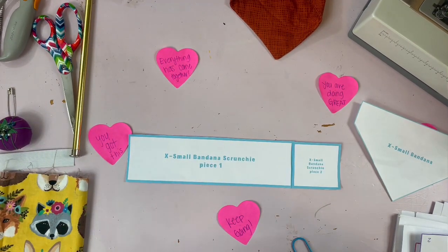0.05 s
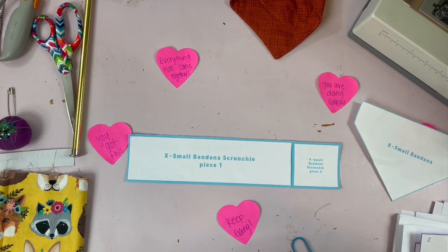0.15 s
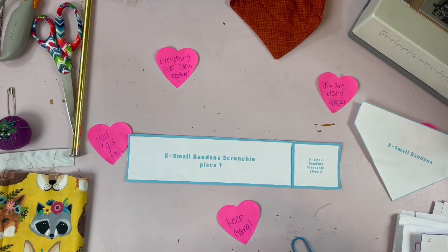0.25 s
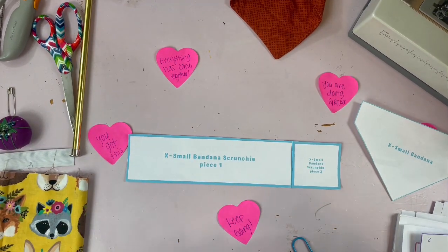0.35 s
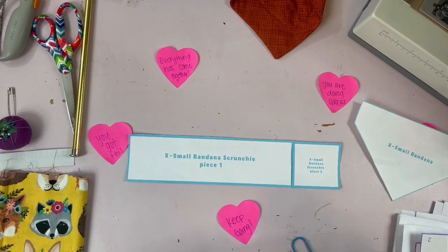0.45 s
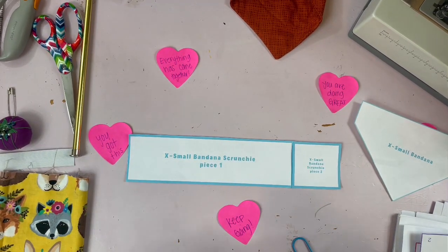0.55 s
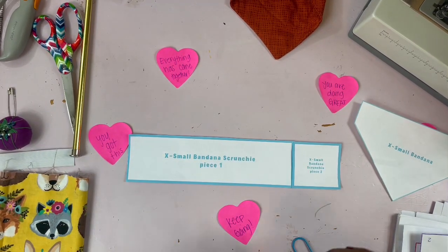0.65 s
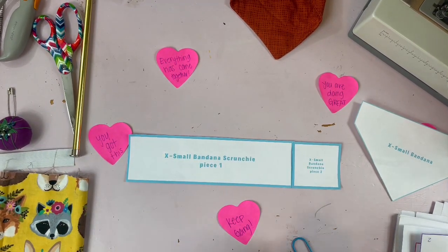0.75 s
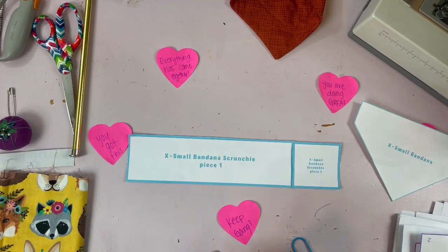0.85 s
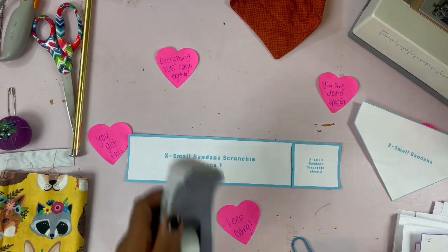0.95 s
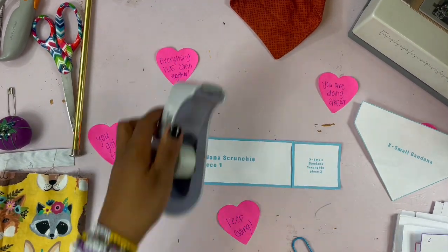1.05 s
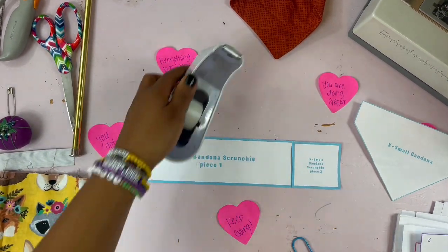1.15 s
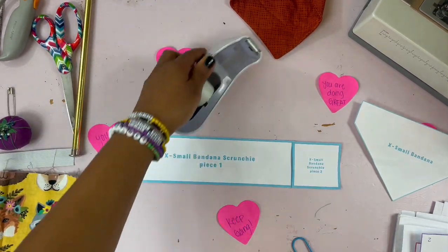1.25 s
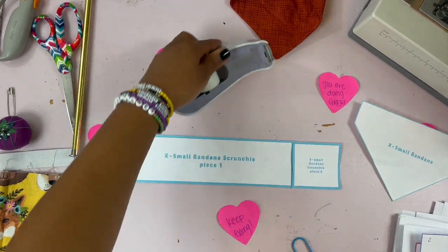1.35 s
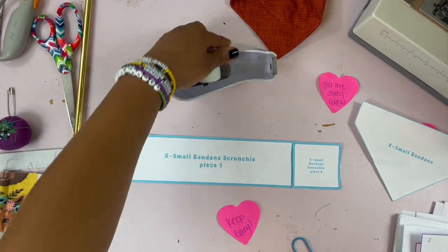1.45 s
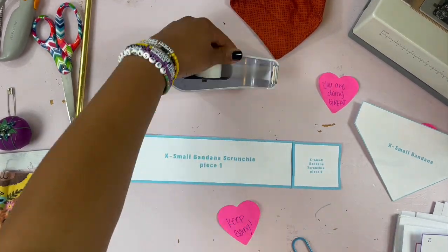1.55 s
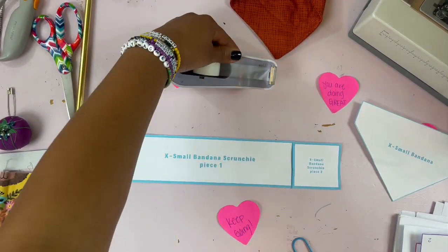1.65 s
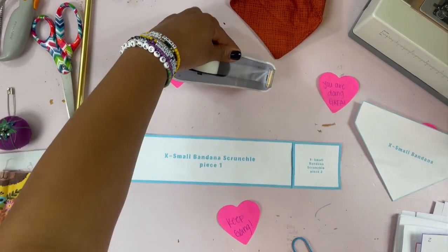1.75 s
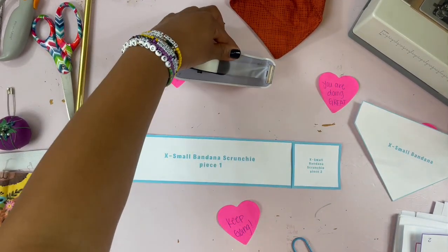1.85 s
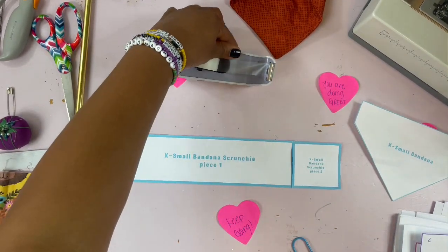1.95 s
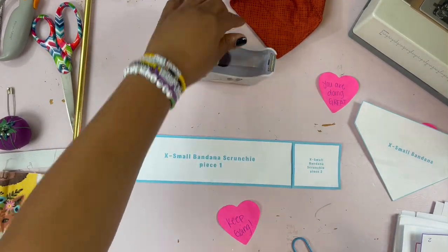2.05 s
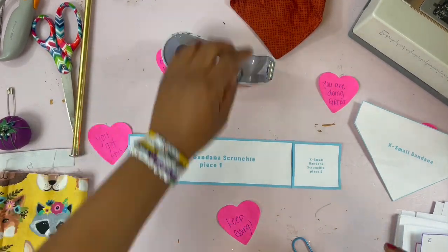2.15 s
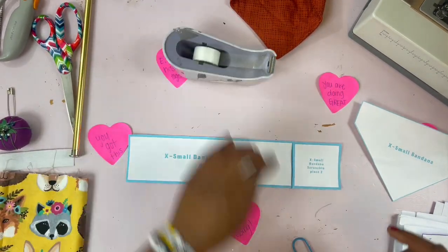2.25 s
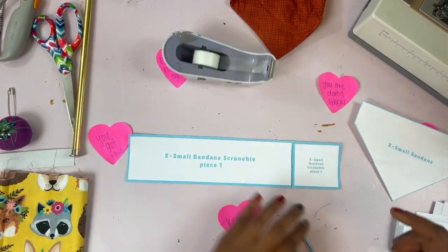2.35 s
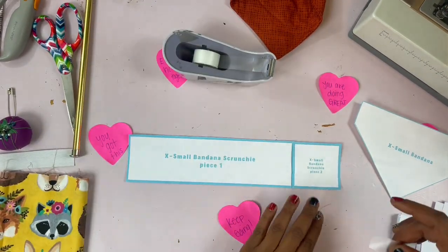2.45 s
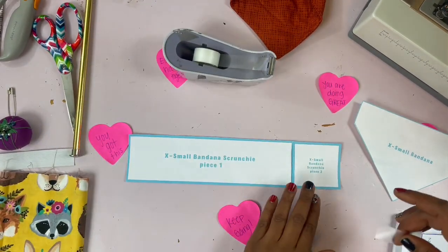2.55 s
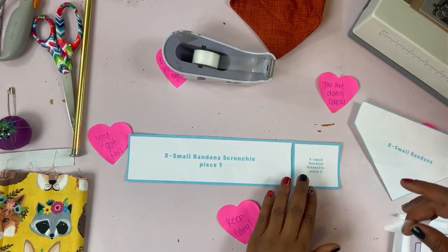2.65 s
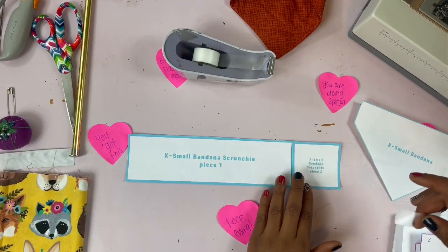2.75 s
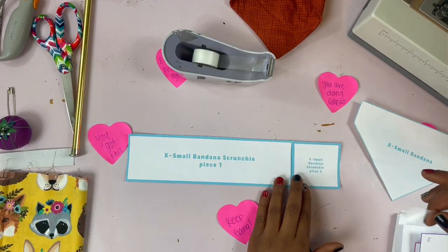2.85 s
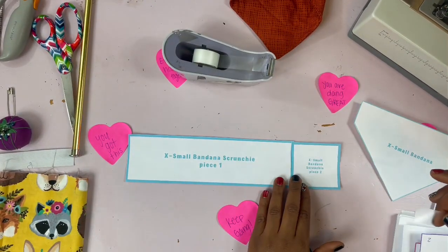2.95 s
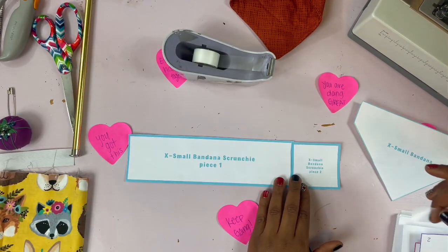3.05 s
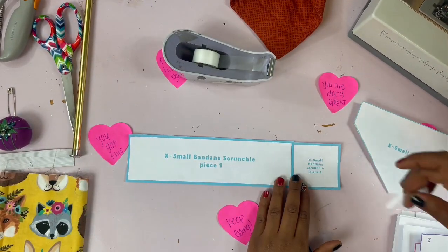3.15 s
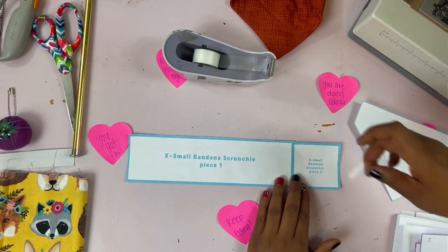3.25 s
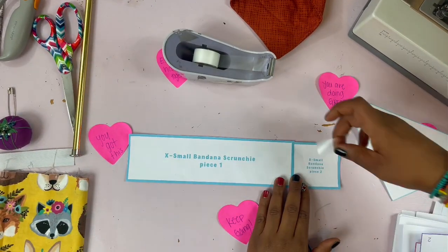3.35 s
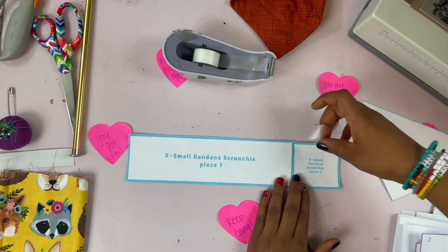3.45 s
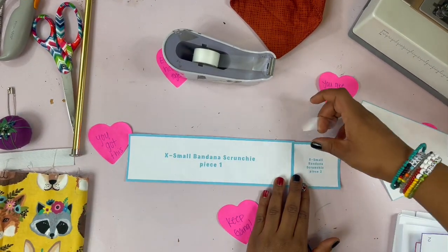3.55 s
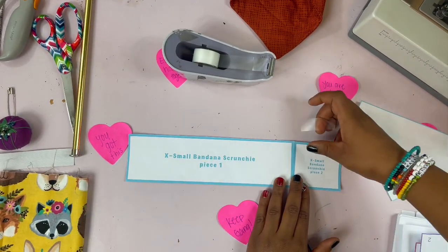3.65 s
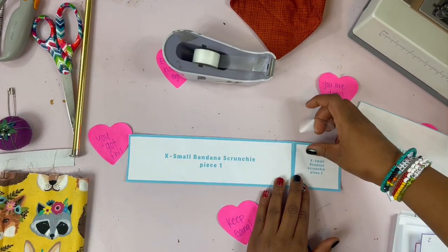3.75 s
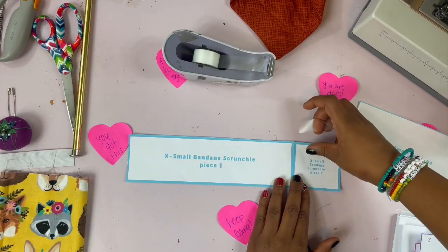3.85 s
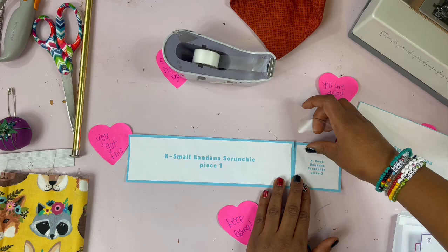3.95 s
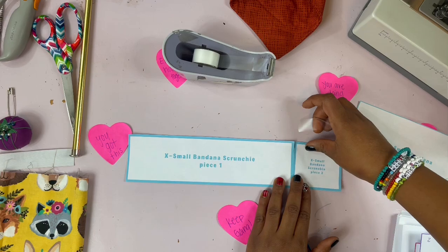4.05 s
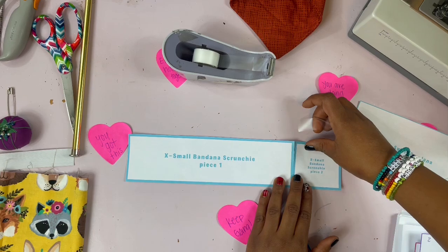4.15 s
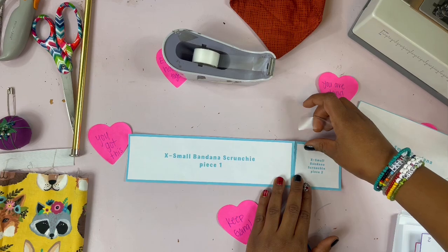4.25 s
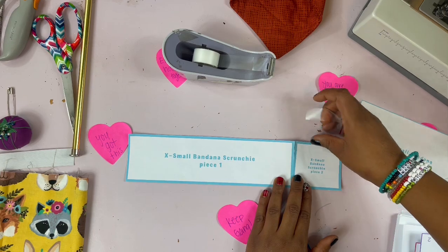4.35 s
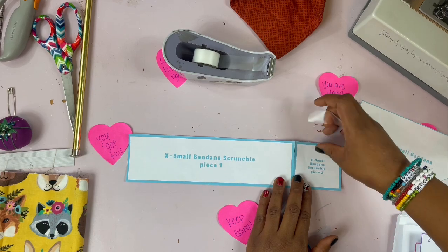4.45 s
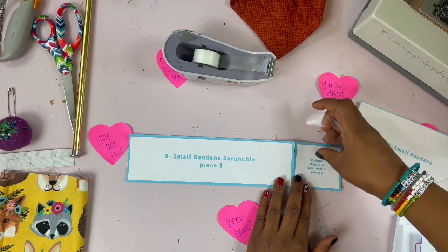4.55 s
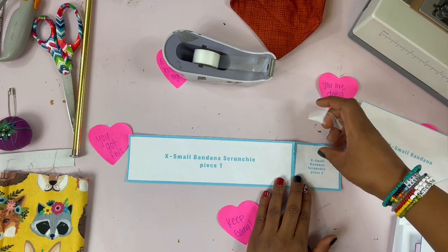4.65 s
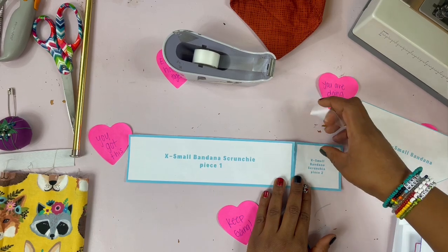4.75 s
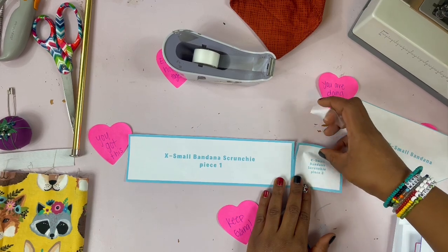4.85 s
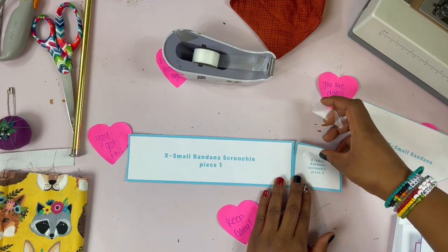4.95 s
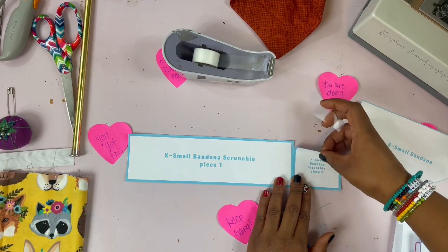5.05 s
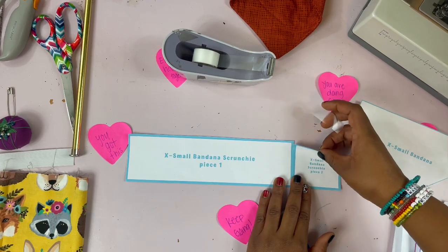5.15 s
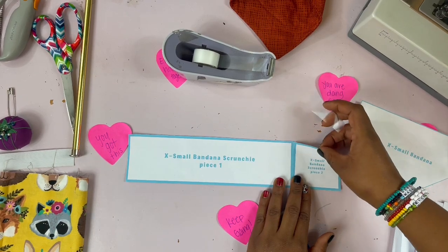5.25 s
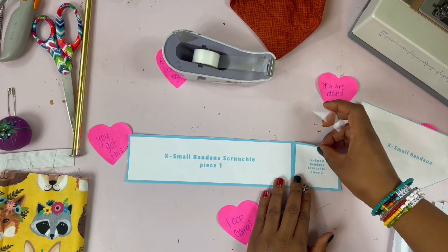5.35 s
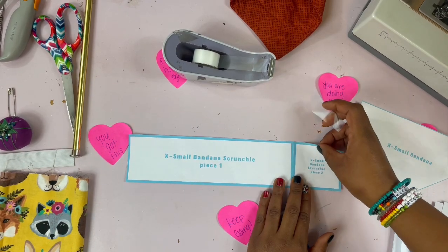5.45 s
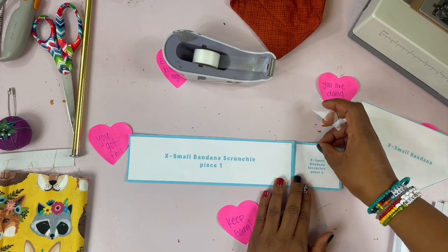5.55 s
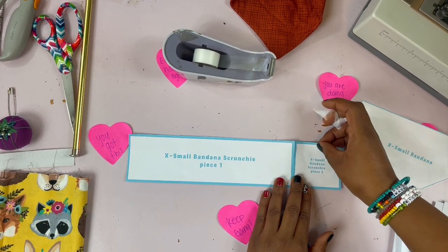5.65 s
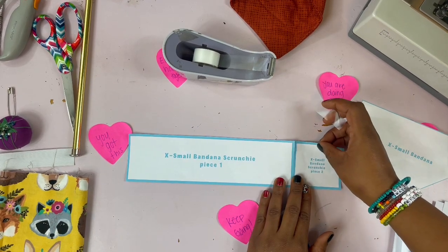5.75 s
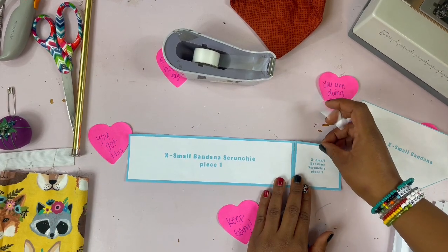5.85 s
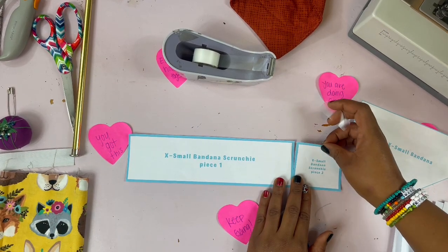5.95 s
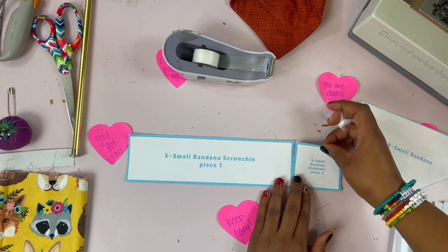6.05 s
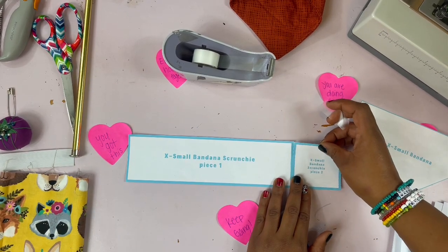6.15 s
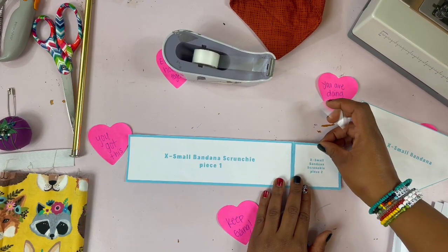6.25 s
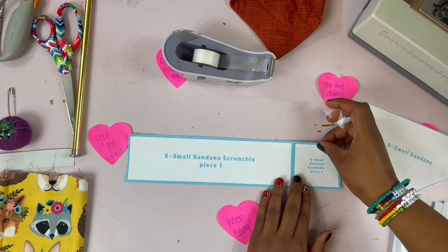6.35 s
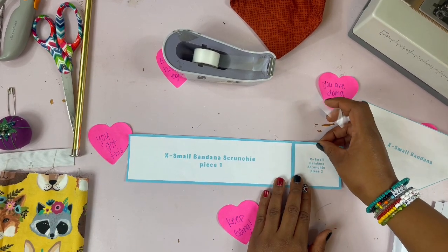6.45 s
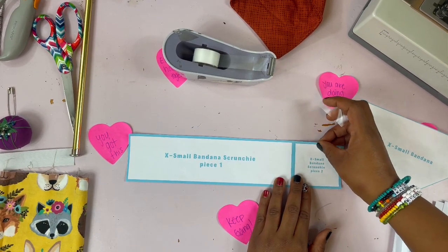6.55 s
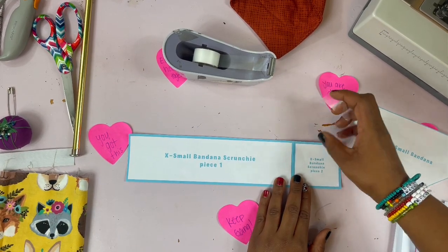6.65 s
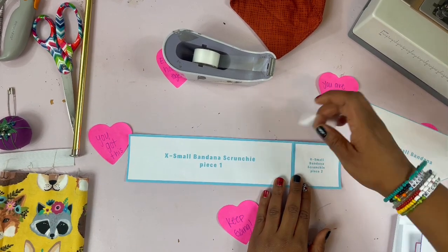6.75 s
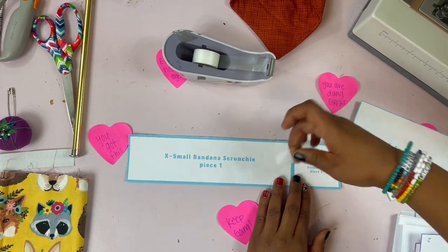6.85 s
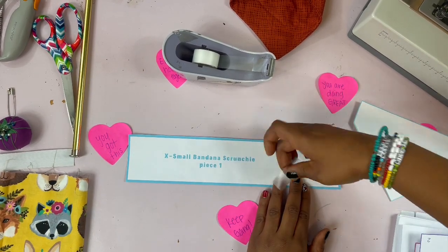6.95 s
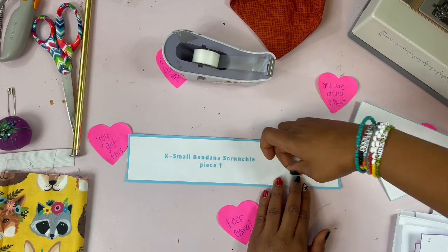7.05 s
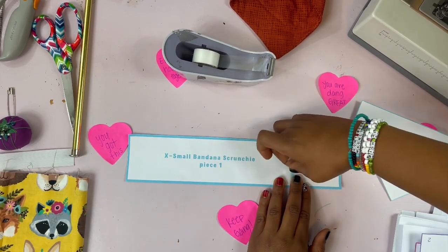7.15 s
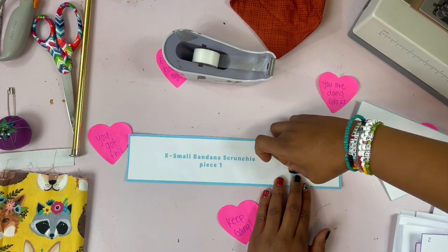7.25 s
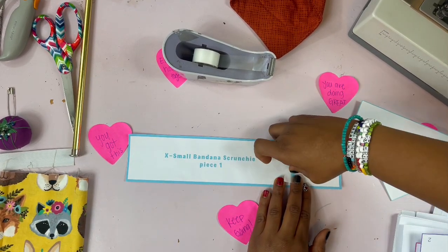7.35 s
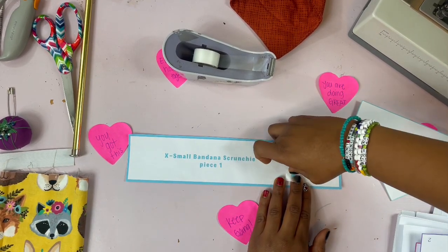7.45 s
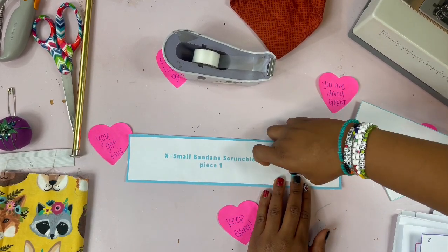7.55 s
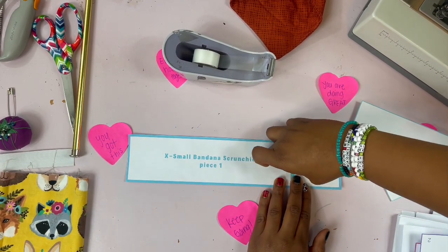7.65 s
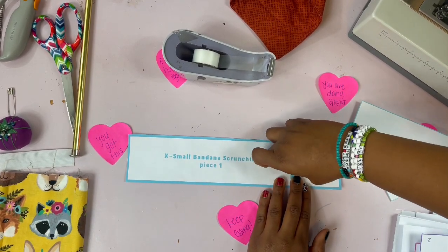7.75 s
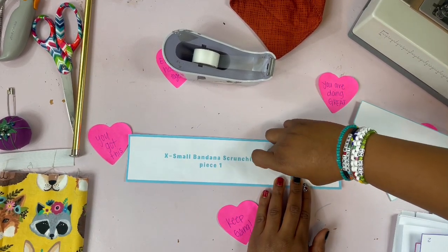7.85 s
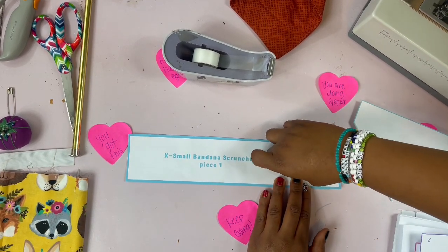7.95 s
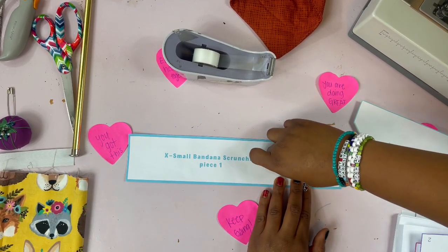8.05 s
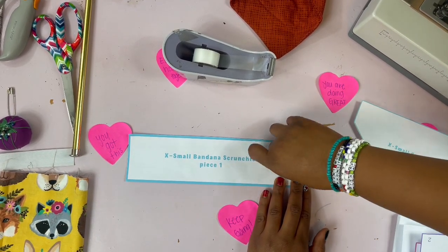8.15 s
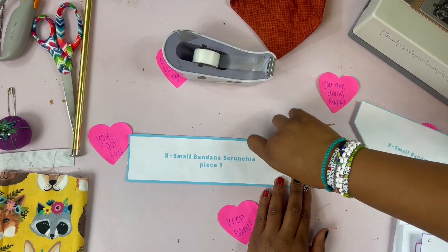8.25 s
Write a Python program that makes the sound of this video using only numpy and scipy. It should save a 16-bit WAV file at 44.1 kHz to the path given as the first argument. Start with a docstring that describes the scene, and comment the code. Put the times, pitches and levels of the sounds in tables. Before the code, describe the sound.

Tape squeals off its roll and snaps, a heavy dispenser knocks down on a table, then faint hand rustles and taps in a small quiet room.

```python
"""Tape hisses and squeals faintly off its roll, close to a two-port microphone in a small, quiet room.
Filtered noise peels and rubs, and a plunging rough tone snaps the tape; short noise bursts click as beads,
plastic and nails. The weighted dispenser is set down in two knocks that ring the table's damped modes.
Later hands slide over paper, a fingertip judders in stick-slip, a strip of tape ticks and nails tap.
Ventilation rumbles low throughout, and the table and hand sounds bring up the room's echoes."""
import sys
import numpy as np
from scipy import signal
from scipy.fft import rfft, irfft, next_fast_len
from scipy.io import wavfile

SR = 44100
rng = np.random.default_rng(int(sys.argv[2]) if len(sys.argv) > 2 else 0)


def wav_record(signal):
    """Record a signal, one row per channel, as 16-bit PCM in the file named by sys.argv[1]."""
    frames = np.transpose(np.atleast_2d(signal))
    bounded = np.clip(frames, -1, 1)
    # unit amplitude maps onto the largest positive 16-bit level
    quanta = np.round(bounded * 32767).astype(np.int16)
    wavfile.write(sys.argv[1], SR, quanta)


N = 366510
T = np.arange(N) / SR

# blows on the table: t/s, peak level/dB, f/Hz above which the soft contact dulls the blow,
# share of the table's free ring time
KNOCKS = [(.532, -36, 234, 0.46), (1.512, -4, 725, 1), (1.7337, -10.5, 378, 0.99), (2.036, -34, 94.4, 1),
          (2.14, -47, 90, 0.61), (2.241, -41.5, 90, 1), (4.504, -40, 700, 0.87), (4.622, -47.5, 322, 0.47),
          (5.183, -38, 350, 0.25), (7.162, -45, 900, 1), (7.888, -34, 910, 0.77), (8.246, -36.5, 580, 0.65)]
# clearest clicks of plastic, beads, tape and nails: t/s, crisp level/dB, hollow level/dB
CLICKS = [(.147, -34, -47), (.153, -37.5, -44), (.165, -38, -38.5), (.169, -35, -40), (0.531, -99, -46.5),
          (0.56, -61.5, -69), (0.637, -18, -37), (0.6863, -50, -45), (1.461, -55, -74.5),
          (1.492, -41.5, -56.5), (1.5109, -39.5, -33.5), (1.52, -37.5, -73), (1.672, -71, -63.5),
          (1.692, -62.5, -70.5), (1.7414, -44, -61), (1.772, -47, -53), (1.842, -56.5, -70),
          (1.852, -59, -70), (1.939, -56.5, -49), (2.032, -40, -45.5), (2.303, -61, -67.5),
          (3.4033, -64.5, -88), (3.432, -62, -80.5), (3.446, -65, -73), (3.6292, -62.5, -80.5),
          (4.631, -56, -72.5), (4.66, -60, -74), (4.722, -64, -77), (4.8204, -57.5, -86),
          (4.852, -43.5, -65), (5.011, -43.5, -61.5), (5.057, -61.5, -59.5), (5.6162, -55.5, -70),
          (6.3325, -74, -58), (6.5881, -42, -60.5), (7.3459, -47.5, -70.5), (7.8865, -38.5, -48),
          (8.191, -55.5, -73), (8.2224, -48.5, -70), (8.231, -49.5, -73), (8.243, -36.5, -73),
          (8.2681, -41.5, -76)]
# relative colour of a crisp click: f/Hz, level/dB
CRISP_COLOUR = [(200, -50.5), (1000, -27.5), (2500, -17), (4000, -8.5), (5400, -4), (6500, -4.5),
                (8300, -2), (10100, 7.5), (11200, -1.5), (12000, -11.5), (16000, -28)]
# relative colour of a bright stroke on paper: f/Hz, level/dB
PAPER_COLOUR = [(200, -14), (400, -3.5), (1000, -7.5), (1800, -7.5), (3000, -4), (4500, 1), (6000, 1.5),
                (8000, 1.5), (10200, 7), (11300, 0), (12300, -10.5), (16000, -25.5)]


def undb(db):
    """Decibels to gain."""
    return 10 ** (np.asarray(db) / 20)


def unit(x):
    """Scale to rms 1."""
    return x / np.sqrt(np.mean(x ** 2))


def add(track, s, sound):
    """Mix a sound into a track from time s on, trimmed at both ends of the track."""
    start = int(s * SR)
    sound, start = sound[max(-start, 0):], max(start, 0)
    track[start:start + len(sound)] += sound[:N - start]


def along(points, hz):
    """Read (Hz, value) points on a log-frequency axis."""
    f, value = np.transpose(points)
    return np.interp(np.log(hz + 1), np.log(f), value)


def colour(x, points, size=4096):
    """Causal minimum-phase filter of unit energy with the given spectrum."""
    cepstrum = irfft(np.log(undb(along(points, np.fft.rfftfreq(size, 1 / SR)))))
    # folding the cepstrum forward puts the energy as early as it can be
    cepstrum[1:size // 2] *= 2
    cepstrum[size // 2 + 1:] = 0
    response = irfft(np.exp(rfft(cepstrum)))
    return signal.oaconvolve(x, response / np.linalg.norm(response))[:len(x)]


def lowpass(x, hz, order=2):
    """Butterworth low-pass."""
    return signal.sosfilt(signal.butter(order, hz, fs=SR, output="sos"), x)


def highpass(x, hz, order):
    """Butterworth high-pass."""
    return signal.sosfilt(signal.butter(order, hz, "highpass", fs=SR, output="sos"), x)


def fade(t, t60):
    """Exponential decay, 60 dB down after t60."""
    return np.exp(-np.log(1000) * t / t60)


def ring(t, hz, t60):
    """One damped mode."""
    return np.sin(2 * np.pi * hz * t) * fade(t, t60)


def walk(hz):
    """Random drift of rms 1, slower than hz."""
    return unit(lowpass(rng.standard_normal(N), hz))


def sing(hz, width_hz):
    """A friction-fed resonance around a moving pitch, rms 1."""
    phase = 2 * np.pi * np.cumsum(hz) / SR
    return unit(walk(width_hz / 2) * np.sin(phase) + walk(width_hz / 2) * np.cos(phase))


def resonate(x, hz, width_hz):
    """A steep resonance, scaled to rms 1."""
    b, a = signal.iirpeak(hz, hz / width_hz, SR)
    once = signal.lfilter(b, a, x)
    return unit(signal.lfilter(b, a, once))


def pan(left_db):
    """Left and right gains of equal total power."""
    return unit(undb([[left_db], [0]]))


def fibres(grain_db=3):
    """Paper fibres catch and let go by the thousand, a few much harder than the rest."""
    strength = np.minimum(rng.exponential(size=N), 6)
    return unit(rng.standard_normal(N) * undb(grain_db * strength))


def pressure(strokes, flutter_db=1.0):
    """Each stroke swells and ebbs, and the hand's weight is never even."""
    out = np.zeros(N)
    for s, length_s, db in strokes:
        add(out, s, undb(db) * np.sqrt(np.hanning(int(length_s * SR))))
    return out * undb(flutter_db * walk(46))


def tape_pull(patchy_db=2.5, patchy_hz=18):
    """The glue hisses as it peels off the roll; the taut strip squeals in fits, lower as the pull ends."""
    # tape unwinding from the roll: t/s, squeal f/Hz, squeal level/dB, glue hiss level/dB
    pull = [(0, 1142, -57, -55.5), (.05, 1084, -63.5, -62.5), (.12, 1072, -61.5, -63),
            (.2, 1108, -70.5, -66), (.31, 1112, -70, -68), (.345, 1058, -63.5, -70.5),
            (.375, 990, -62.5, -75.5), (.41, 990, -78, -85.5), (.46, 975, -100, -100)]
    # partials of the taut strip: multiple of the pitch, width/Hz, relative level/dB
    strip = [(1, 79.97, -2.5), (1.18, 200, -5), (2.17, 220, -13)]
    s, *columns = np.transpose(pull)
    hz, squeal_db, hiss_db = (np.interp(T, s, column) for column in columns)
    squeal = 0
    for multiple, width_hz, db in strip:
        fits = unit(undb(patchy_db * walk(patchy_hz)))
        squeal = squeal + undb(db) * fits * sing(multiple * hz, width_hz)
    hiss = colour(fibres(), PAPER_COLOUR)
    return (undb(squeal_db) * squeal + undb(hiss_db) * hiss) * (T < s[-1])


def room_tone(db=-60, sway_db=1, lowest_hz=38, hum_hz=103, hum_db=-69, whine_hz=1529, whine_db=-94):
    """Low ventilation rumble, as coloured noise, with a wavering hum and a thin steady whine."""
    # relative colour of the ventilation rumble: f/Hz, level/dB
    air = [(15, -34), (25, -7.5), (103, 0), (154, -9.5), (219, -3.5), (326, -7.5), (394, -15.5),
           (856, -28.5), (1500, -32.5), (1760, -39.5), (4750, -45.5), (7090, -43.5), (8780, -58),
           (10600, -42), (15000, -69)]
    rumble = colour(rng.standard_normal(N), air) * undb(db + sway_db * walk(42))
    rumble = highpass(rumble, lowest_hz, order=4)
    hum = unit(np.sin(2 * np.pi * hum_hz * T) * walk(29))
    whine = unit(np.sin(2 * np.pi * whine_hz * T))
    return rumble + undb(hum_db) * hum + undb(whine_db) * whine


def grazes(lead_s=0.018, length_s=0.068, full_scale_db=-38.5, growth=0.63):
    """Surfaces graze each other around each click: (start s, length s, dB), growth in dB per crisp dB."""
    return [(s - lead_s, length_s, full_scale_db + growth * crisp_db) for s, crisp_db, _ in CLICKS]


def rubbing(grit_db=3, grit_hz=400, drift=0.016, drift_hz=9):
    """Friction noise: smooth strokes, clumped gritty scrapes, dull brushing and a drag that wanders in pitch."""
    # smooth strokes of skin and paper: start t/s, length/s, level/dB
    strokes = [(.86, 0.2, -66), (1.465, 0.043, -65), (1.79, 0.43, -71), (1.96, 0.096, -54.5),
               (2.06, 0.32, -65), (4.89, 0.13, -58.5), (7.89, 0.096, -65), (8.155, 0.093, -62)]
    # rasps of tape on paper: start t/s, length/s, level/dB
    rasps = [(4.85, 0.048, -46), (4.935, 0.047, -48), (5.0105, 0.062, -51.5), (8.2214, 0.064, -57)]
    # bracelets swing to and fro as the hand settles, a swish a swing: start t/s, length/s, level/dB
    swishes = [(2.367, 0.075, -67.5), (2.443, 0.082, -64.5), (2.535, 0.06, -68.5), (2.623, 0.055, -63),
               (2.707, 0.048, -71.5), (2.796, 0.052, -65.5), (2.881, 0.024, -66.5), (2.961, .03, -70.5)]
    # dull brushing of hands and arms over the table: start t/s, length/s, level/dB
    brushes = [(.8, 0.6, -72.5), (.85, 0.14, -65.5), (1.15, .13, -66.5), (2.05, 0.33, -63),
               (2.4, 0.15, -79.5), (2.69, 0.25, -77.5), (3.15, 0.21, -83.5), (3.44, 0.26, -80.5)]
    # relative colour of dull brushing: f/Hz, level/dB
    brush_colour = [(200, -9), (600, -6), (1200, -5), (1900, -6.5), (2600, -10.5), (3500, -12.5),
                    (12000, -33)]
    # a fingertip dragged over paper lying on the table: start t/s, length/s, level/dB
    drags = [(4.565, 0.41, -67), (4.84, 0.3, -63.5), (5.165, 0.08, -66.5)]
    # resonances of the dragged fingertip: f/Hz, width/Hz, relative level/dB
    drag_bands = [(315, 140, 3.5), (1040, 130, -7.5), (1700, 295, -13.5), (2590, 450, -12.5),
                  (3130, 200, -15), (5630, 700, -13), (7600, 410, -8)]
    bend = 1 + drift * walk(drift_hz)
    drag = sum(undb(db) * sing(hz * bend, width_hz) for hz, width_hz, db in drag_bands)
    grit = unit(undb(grit_db * walk(grit_hz)))
    effort = pressure(strokes) + grit * pressure(rasps + swishes + grazes())
    bright = colour(fibres() * effort, PAPER_COLOUR)
    dull = colour(fibres() * pressure(brushes), brush_colour)
    return bright + dull + drag * pressure(drags, flutter_db=2.5)


def snap(s=.6318, length_s=.0092, from_hz=5500, to_hz=2250, plunge=6, tone_db=-19.0, crackle_db=-21,
         rough=.9, lowest_hz=900, ping_hz=10220, ping_db=-5, ping_t60=0.018, break_share=.62):
    """Tape tears on the cutter: a rough resonance plunges, breaks with a ping and rings; plops lie around it."""
    # what the snap leaves ringing: f/Hz, level/dB, t60/s
    snap_ring = [(3030, -48, 0.22), (5426, -42, 0.19), (7780, -42, 0.14), (10240, -36, .08)]
    # hollow little plops: t/s, f/Hz, level/dB, t60/s
    plops = [(.146, 1910, -30, .016), (.151, 2280, -28, .016), (.168, 373, -43, .16),
             (0.6866, 810, -28, 0.047), (.752, 780, -40.5, 0.035)]
    out, t = np.zeros(N), T[:int(length_s * SR)]
    opening = t / length_s
    # the pitch falls as the gap opens
    plunged = (1 + np.tanh(plunge * (opening - .5))) / 2
    phase = 2 * np.pi * np.cumsum(from_hz * (to_hz / from_hz) ** plunged) / SR
    tone = np.sin(phase) * (1 + rough * walk(1100)[:len(t)])
    crackle = colour(rng.standard_normal(len(t)), CRISP_COLOUR)
    swell = np.sqrt(np.sin(np.pi * opening ** 1.1))
    burst = (undb(tone_db) * unit(tone) + undb(crackle_db) * crackle) * swell
    # so small a gap radiates no bass
    add(out, s, highpass(burst, lowest_hz, order=2))
    for hz, db, t60 in snap_ring + [(ping_hz, ping_db, ping_t60)]:
        add(out, s + break_share * length_s, undb(db) * ring(T[:SR // 2], hz, t60))
    for plop_s, hz, db, t60 in plops:
        add(out, plop_s, undb(db) * ring(T[:SR // 4], hz, t60))
    return out


def contacts(full_scale_db=-35.5, growth=.76, crisp_over_hollow_db=-9):
    """Lone clicks and landing blows, as (s, crisp dB, hollow dB); growth in dB per dB of the blow."""
    rows = list(CLICKS)
    for s, db, _, _ in KNOCKS:
        hollow_db = full_scale_db + growth * db
        rows.append((s, hollow_db + crisp_over_hollow_db, hollow_db))
    return rows


def clicks(span_s=0.0085, rise_s=0.00065, equal_decay_s=0.0058, doubling_db=22.5):
    """A click is a quick cluster of tiny contacts: a noise burst, its level the rms over span_s."""
    # relative colour of a hollow click: f/Hz, level/dB
    hollow_colour = [(60, -37), (200, -15.5), (400, 1), (650, -9), (1000, -0.5), (1500, 2), (2200, -3),
                     (3200, -10.5), (5000, -18.5), (10000, -38)]
    crisp, hollow, t = np.zeros(N), np.zeros(N), T[:SR // 20]
    for s, crisp_db, hollow_db in contacts():
        # the time constant doubles for each doubling_db more of the hollow part
        decay_s = equal_decay_s * 2 ** ((hollow_db - crisp_db) / doubling_db)
        shape = (1 - np.exp(-t / rise_s)) * np.exp(-t / decay_s)
        for track, db in (crisp, crisp_db), (hollow, hollow_db):
            burst = rng.standard_normal(len(t)) * shape
            burst *= np.sqrt(span_s * SR) / np.linalg.norm(burst)
            add(track, s - rise_s, undb(db) * burst)
    return colour(crisp, CRISP_COLOUR) + colour(hollow, hollow_colour)


def blows(rebound_s=.0168, rebound_db=-8.5):
    """Each knock and its weaker second landing, which a damping hand weakens too; rows as in KNOCKS."""
    rebounds = [(s + rebound_s, db + rebound_db + 20 * np.log10(free), contact_hz, free)
                for s, db, contact_hz, free in KNOCKS]
    return KNOCKS + rebounds


def knocks(crack_db=-14, crack_t60=.28, boom_db=-26, boom_t60=.36, boom_hz=500):
    """A blow rings the table's main modes and a dense mass of weak ones; a hand that stays down damps them."""
    # main modes of the table top: f/Hz, relative level/dB, t60/s, left port over right/dB
    table_modes = [(88.02, -20, 0.24, 0), (103, -15.5, .15, 0.5), (121.5, -15, .19, 1),
                   (176, -10, .16, 0.5), (222.7, -14.5, .24, -0.5), (248.3, -3.5, .11, -0.5),
                   (295, -0.5, .11, -1.5), (375.9, -12.5, 0.22, -2), (417, -13, .15, -2.5),
                   (458, -16, 0.14, 0), (548.4, 0.5, .075, 11), (808, -13.5, 0.15, -2),
                   (899, -15, 0.065, -2), (1026, -24.5, 0.36, 0)]
    # relative colour of the table's dense weak modes: f/Hz, level/dB
    thud_colour = [(30, -30.5), (60, -4.5), (120, -1.5), (300, -4), (500, -10.5), (640, -17), (900, -4.5),
                   (1800, -11.5), (4000, -40)]
    out, t = np.zeros((2, N)), T[:SR]
    for s, db, contact_hz, free in blows():
        modes = np.zeros((2, SR))
        for k, (hz, mode_db, t60, left_db) in enumerate(table_modes):
            # neighbouring modes start in opposite directions
            modes += (-1) ** k * undb(mode_db) * pan(left_db) * ring(t, hz, t60 * free)
        crack = undb(crack_db) * rng.standard_normal(SR) * fade(t, crack_t60 * free)
        boom = rng.standard_normal(SR) * fade(t, boom_t60 * free)
        boom = undb(boom_db) * lowpass(boom, boom_hz, order=1)
        blow = lowpass(modes + colour(crack + boom, thud_colour), contact_hz, order=3)
        # the peak level is that of the two ports' average
        blow /= np.abs(blow.mean(axis=0)).max()
        for track, port in zip(out, blow):
            add(track, s, undb(db) * port)
    return out


def shove(s=0.86, length_s=0.161, db=-55, hz=365, width_hz=190):
    """The dispenser's base slides a little as it is picked up: friction noise through a resonance."""
    return resonate(fibres(), hz, width_hz) * pressure([(s, length_s, db)])


def judder(s=5.106, width_s=0.0093, slip_hz=235, rise_octaves=0.18, db=-28.0, wander=0.02,
           release_s=5.106, rise_s=0.0026):
    """A fingertip sticks and slips ever faster for a few cycles, groans bluntly and breaks free ringing."""
    # what it leaves ringing: f/Hz, level ahead of the soft onset/dB, t60/s
    judder_ring = [(394, -32.5, 0.067), (1020, -55, 0.054)]
    away = (T - s) / width_s
    hz = slip_hz * 2 ** (rise_octaves * np.tanh(away / 2)) * (1 + wander * walk(70))
    swell = 1 / (1 + away ** 2) * np.exp(-np.abs(away) / 10)
    out = undb(db) * swell * np.sin(2 * np.pi * np.cumsum(hz) / SR)
    t = T[:SR // 4]
    ringing = sum(undb(ring_db) * ring(t, f, t60) for f, ring_db, t60 in judder_ring)
    add(out, release_s, (1 - np.exp(-t / rise_s)) * ringing)
    return out


def room(x, early_db=-13, early_t60=0.11, late_db=-14.0, late_t60=0.45, damping_hz=15000,
         reflection_s=.0124, reflection_db=-19):
    """Mid and side echoes: the nearest hard surface, a brief flurry and a longer tail that loses its treble."""
    # edges of the bands in which the echoes die away: f/Hz
    room_edges = [120, 350, 800, 1600, 2800, 4600, 7000, 9400, 11200, 13000, 17000]
    # relative strength of the echoes: lower band edge f/Hz, level/dB
    echo_strength = [(120, -10), (350, -4.5), (800, 0.5), (1600, 2), (2800, 1), (7000, -6), (9400, -5.5),
                     (11200, -7.5), (13000, -13.5)]
    t = T[:SR * 3 // 4]
    response = np.zeros((2, len(t)))
    for lo, hi in zip(room_edges, room_edges[1:]):
        band = signal.butter(3, [lo, hi], "bandpass", fs=SR, output="sos")
        tails = (early_db, early_t60), (late_db, late_t60 / (1 + (lo / damping_hz) ** 4))
        energy = sum(undb(db) ** 2 * unit(fade(t, t60)) ** 2 / len(t) for db, t60 in tails)
        noise = np.sqrt(energy) * rng.standard_normal(response.shape)
        response += undb(along(echo_strength, lo)) * signal.sosfilt(band, noise)
    response[0, int(reflection_s * SR)] += undb(reflection_db)
    return signal.fftconvolve(x[None], response, axes=1)[:, :N]


def scene(apart_db=-3, air_apart_db=-19, hiss_db=-93, table_room_db=-4, snap_room_db=-3):
    """Both ports hear nearly the same; table modes, part of the room and air, and a faint hiss differ."""
    table = knocks() + judder() + shove()
    hands = clicks() + rubbing() + tape_pull()
    sticky = snap()
    to_room = hands + undb(table_room_db) * table.mean(axis=0) + undb(snap_room_db) * sticky
    echo_mid, echo_side = room(to_room)
    mid = hands + sticky + echo_mid + room_tone()
    hiss = colour(rng.standard_normal(N), PAPER_COLOUR)
    side = undb(apart_db) * echo_side + undb(air_apart_db) * room_tone() + undb(hiss_db) * hiss
    return table + np.array([mid + side, mid - side])


def record(dry, top_hz=15500):
    """The microphone's two ports differ in phase and sensitivity; a steep low-pass cuts the top."""
    # phase lead of the left port over the right: f/Hz, lead/rad
    port_phase = [(0, 0), (780, 1.5), (2670, 0.27), (3100, 1.51), (3700, 1), (4480, 2), (5770, 7),
                  (6800, 7), (7670, 7.5), (9000, 9.5), (10300, 10.5), (11500, 14.5), (13700, 14),
                  (14600, 14.5), (16000, 15)]
    # sensitivity of the left port over the right: f/Hz, level/dB
    port_balance = [(60, -0.5), (110, -2.5), (380, -5.5), (700, -1.5), (1300, 0)]
    size = next_fast_len(N + SR // 10)
    hz = np.fft.rfftfreq(size, 1 / SR)
    lead = np.interp(hz, *np.transpose(port_phase))
    balance = undb(along(port_balance, hz))
    # the two ports' total power stays the same at every frequency
    ports = np.array([balance, np.exp(-1j * lead)]) * np.sqrt(2 / (1 + balance ** 2))
    heard = irfft(rfft(dry, size) * ports, size)[:, :N]
    return signal.sosfilt(signal.ellip(8, .2, 70, top_hz, fs=SR, output="sos"), heard)


dry = scene()
out = record(dry)
wav_record(out)
```